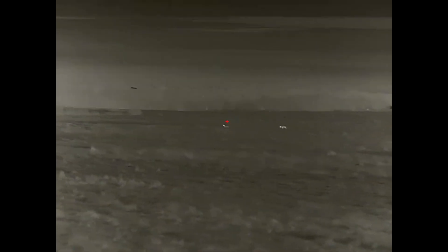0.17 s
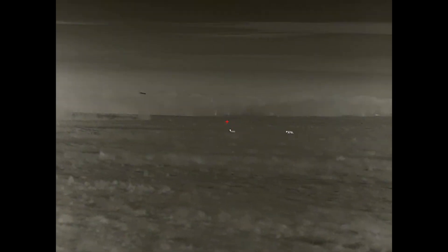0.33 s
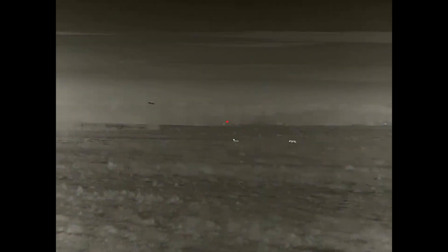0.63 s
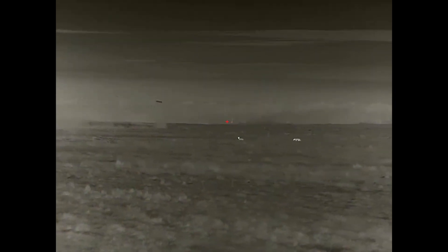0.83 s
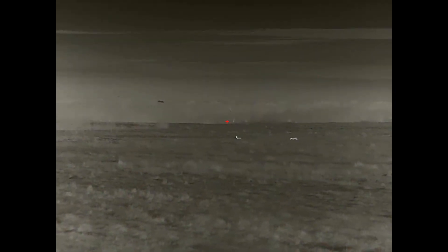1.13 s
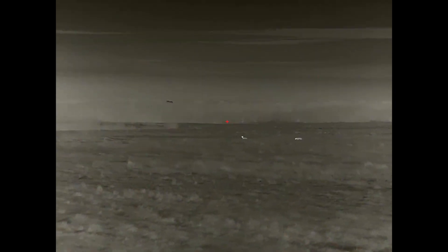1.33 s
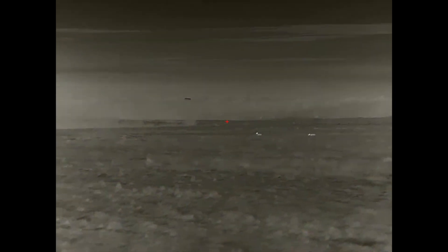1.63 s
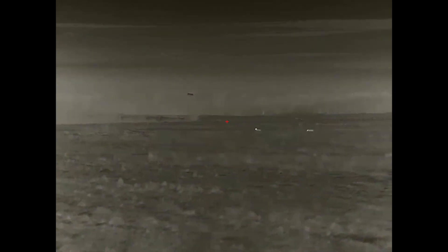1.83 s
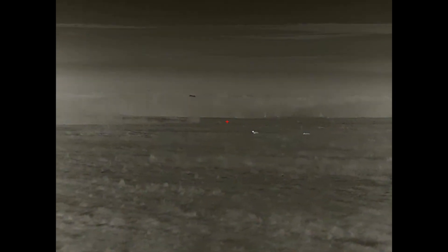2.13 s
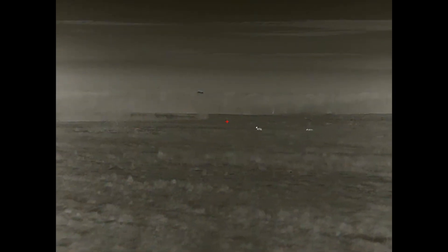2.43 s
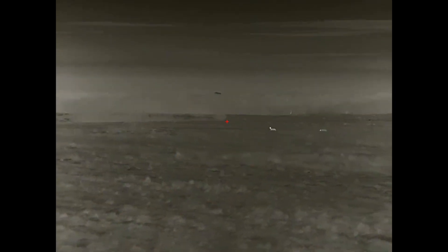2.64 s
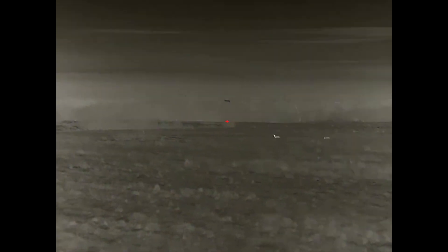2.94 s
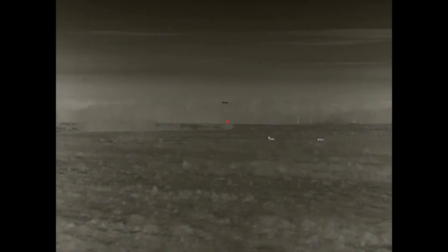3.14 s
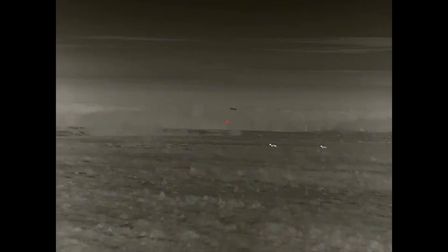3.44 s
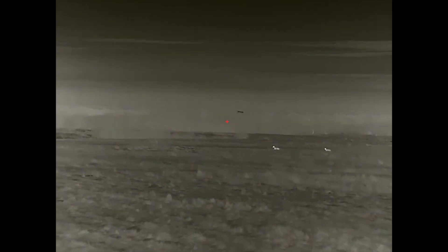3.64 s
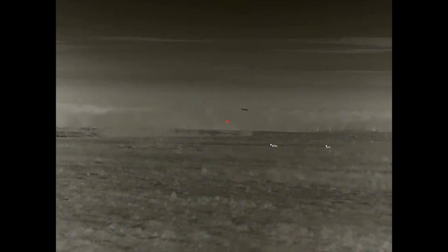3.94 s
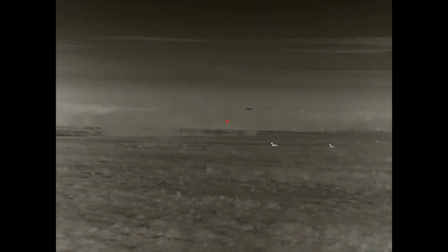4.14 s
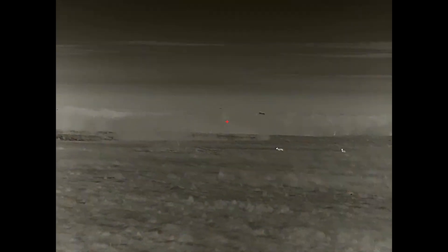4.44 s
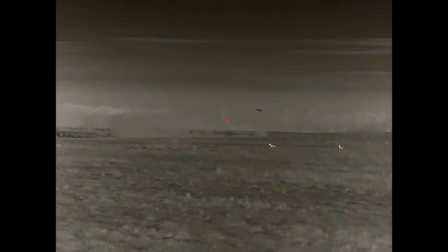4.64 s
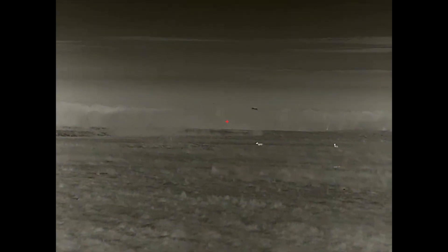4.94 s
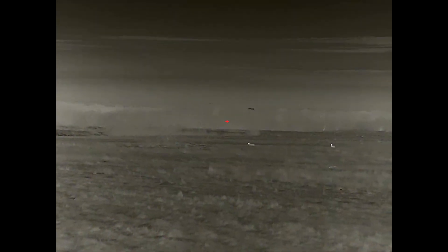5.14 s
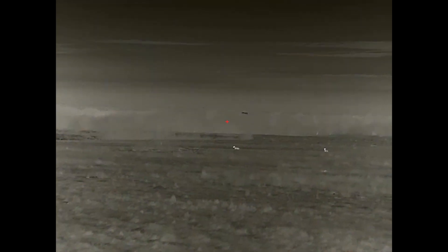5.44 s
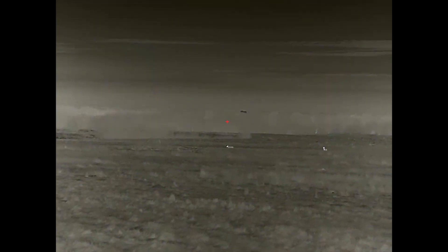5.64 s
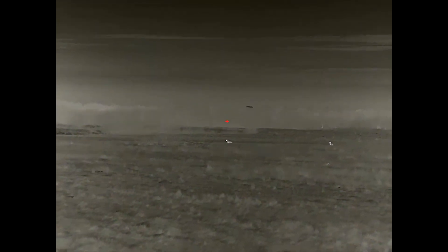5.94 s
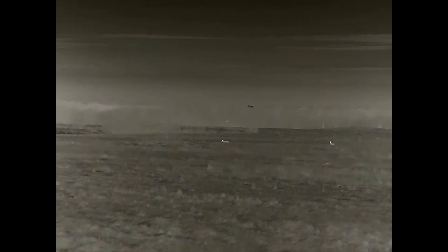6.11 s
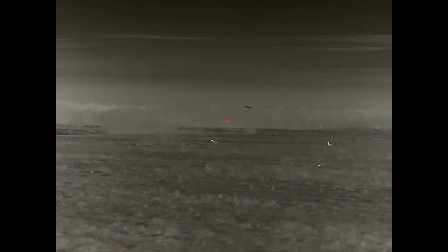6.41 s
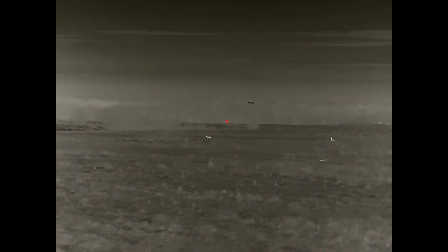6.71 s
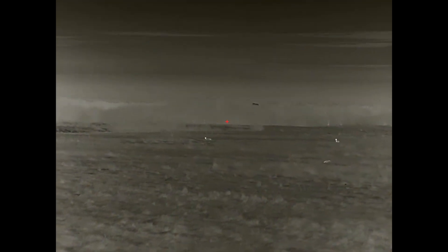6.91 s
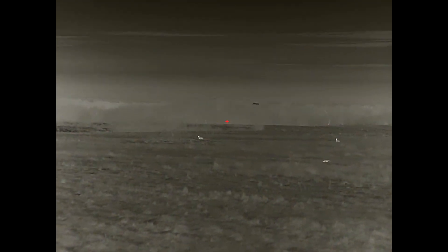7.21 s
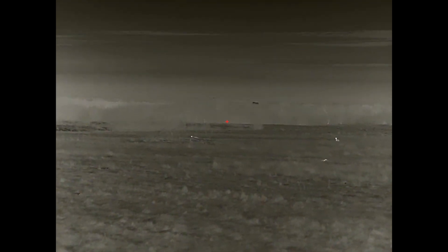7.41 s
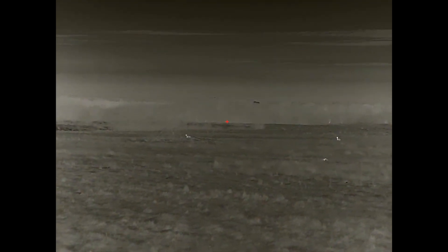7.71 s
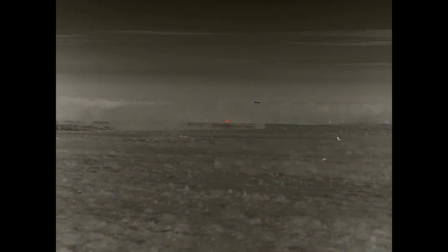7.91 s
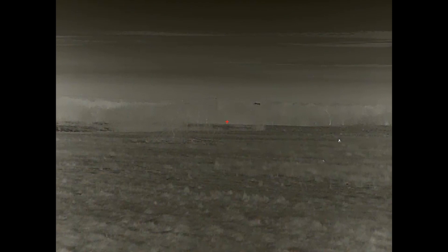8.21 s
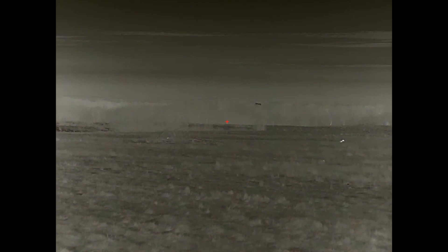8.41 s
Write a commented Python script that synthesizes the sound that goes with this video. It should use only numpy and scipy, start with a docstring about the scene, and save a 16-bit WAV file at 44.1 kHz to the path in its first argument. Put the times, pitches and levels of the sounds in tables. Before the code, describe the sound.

In an open field at night, thin bassless yelps like a coyote in distress, probably from a lure loudspeaker, repeat nearly without pause and leave echoing tails. A hand-held stereo microphone catches rumbling gusts, faint hiss, small rubs and clicks, mostly in the first two seconds. Wind eases around five to six seconds, when faint low blips appear, then it returns.

```python
"""Yelps over a windy field

One high canine voice yelps about twice a second over an open field at night, probably played by a lure
loudspeaker: gliding harmonics that stop near 5 kHz, with decaying noise as a long echo. The yelps drift left.
Bands of turbulent noise buffet the microphone ports over a steady hiss. The housing rustles and ticks in
the hands as enveloped noise, and a few low blips sound as gliding sines."""
import sys
import numpy as np
from scipy import signal
from scipy.fft import rfft, irfft, next_fast_len
from scipy.io import wavfile
from scipy.ndimage import uniform_filter1d

SR = 44100
rng = np.random.default_rng(int(sys.argv[2]) if len(sys.argv) > 2 else 0)


def digitize_waveform(pressure):
    """Quantize a signal to 16-bit integers and store it at the path in sys.argv[1].

    Rows of a 2-D input are taken as channels; values are limited to [-1, 1].
    """
    field = np.atleast_2d(pressure).T
    bounded = np.clip(field, -1, 1)
    quanta = np.round(bounded * 32767).astype(np.int16)
    wavfile.write(sys.argv[1], SR, quanta)


N = 377496
TIME = np.arange(N) / SR
SIDE_SHARE = .42  # left-right difference noise against the common noise, in hiss and rustle
OPPOSITE = np.array([[1], [-1]])  # left and right in opposite phase

# where the voice breaks into a rasp: start t/s, end t/s, roughness [0-1], strong-weak depth [0-1],
# hoarse air level/dB
RASPS = [(1.76, 1.95, .22, 0, -66), (3.12, 3.17, .15, 0, -64), (4.1, 4.24, .15, 0, -70),
         (4.8, 4.93, .3, 0, -61), (6.85, 6.9, .25, 0, -63), (7.2, 7.34, .15, .15, -62),
         (7.35, 7.4, .45, 0, -53), (7.645, 7.8, .5, .8, -53), (7.98, 8.16, .3, 0, -61),
         (8.45, 8.56, .45, .3, -57)]


def undb(db):
    """Amplitude ratio of a level in dB: 20 dB for each factor of ten."""
    return 10 ** (np.asarray(db) / 20)


def unit(x):
    """Normalises the power: scaled to rms 1."""
    return x / np.sqrt(np.mean(x ** 2))


def on_log(hz, table):
    """Interpolates (f/Hz, value) rows along log frequency, as pitch is spaced."""
    f, value = np.transpose(table)
    return np.interp(np.log(np.maximum(hz, 1)), np.log(f), value)


def shaped(x, gain):
    """Linear filtering: the spectrum is multiplied by a gain that depends on frequency."""
    size = next_fast_len(N)
    f = np.arange(size // 2 + 1) * SR / size
    return irfft(rfft(x, size) * gain(f), size)[:N]


def walk(rate):
    """Low-pass random modulation: levels held 1 / rate s, slewed twice, rms 1."""
    hold = int(SR / rate)
    steps = np.repeat(rng.standard_normal(N // hold + 1), hold)
    slewed = uniform_filter1d(uniform_filter1d(steps, hold), hold)
    return unit(slewed[:N])


def sides(x, pan_db):
    """Level-difference stereo: places a sound by its left minus right level."""
    return x * undb(np.array([pan_db, -pan_db]).reshape(2, -1) / 2)


def bell(s, half_s):
    """Gaussian envelope: a smooth rise and fall around a moment, down to 1/e after half_s."""
    return np.exp(-((TIME - s) / half_s) ** 2)


def wind():
    """Turbulence as band noise: eddies puff the upper bands together, and each band flickers alone."""
    # level between the buffets: t/s, level/dB
    calm_levels = [(0, -37.5), (.3, -37.5), (.7, -40.5), (1.1, -41), (1.6, -41.5), (1.9, -38.5),
                   (2.2, -40.5), (2.8, -41.5), (3.15, -39.5), (3.55, -35.5), (3.85, -41), (4.5, -44),
                   (5.2, -47), (6.25, -46.5), (6.5, -42.5), (7, -41), (7.8, -41), (8.56, -42)]
    # buffets and lulls: t/s, rise level/dB, half length t/s
    buffets = [(0.05, 1.5, .05), (0.316, 3, 0.044), (0.507, 5.5, 0.013), (0.937, 7, 0.019),
               (1.205, 4, 0.058), (1.366, 6.5, 0.043), (1.525, 4, 0.026), (1.69, 6.5, 0.068),
               (2.054, 5.5, 0.038), (2.39, 3, 0.044), (2.554, 3.5, 0.025), (3.004, 3.5, .04),
               (3.088, -4, 0.045), (3.94, 4.5, 0.14), (4.618, -3, 0.088), (5.7, 3, 0.06),
               (6.057, 2.5, 0.08), (7.907, -6, 0.043), (8.284, 6.5, 0.048)]
    # relative spectral density of the turbulence: f/Hz, level/dB per Hz
    turbulence_colour = [(12, -26), (20, -5), (69, 3), (131, 2), (274, -12.5), (381, -20.5), (479, -22.5),
                         (698, -33), (808, -34.5), (1000, -40), (1300, -44.5), (2200, -120)]
    # upper bands move more than the rumble: extra dB per dB, about the even level
    gust_slope, gust_even_db = 0.76, -41.5

    def colour(f):
        return undb(on_log(f, turbulence_colour))

    puffs, noise = walk(14), rng.standard_normal(N)
    rumble_db = np.interp(TIME, *np.transpose(calm_levels))
    rumble_db = rumble_db + sum(db * bell(s, half_s) for s, db, half_s in buffets)
    gust_db = rumble_db + gust_slope * (rumble_db - gust_even_db)
    scale = np.std(shaped(noise, colour))

    common = np.zeros(N)
    for hz in 22 * 2 ** np.arange(0, 6.5, .5):  # centres half an octave apart
        def band_gain(f):
            octaves = np.clip(np.log2(f / hz + 1e-9), -.5, .5)
            return np.cos(np.pi * octaves) ** 2 * colour(f)

        band = shaped(noise, band_gain)
        upper = np.clip(np.log2(hz / 130) / 0.88, 0, 1)  # 0 follows the rumble, 1 the gusts
        level_db = (1 - upper) * rumble_db + upper * (gust_db + 1.58 * puffs)
        common += band * undb(level_db + 1.85 * walk(7.6)) / scale

    # the difference between the ports lacks the deepest rumble
    apart = shaped(rng.standard_normal(N), lambda f: colour(f) * f / (f + 300))
    return sides(common, 1.93) + undb(gust_db - 39.0) * unit(apart) * OPPOSITE


def hiss():
    """Stationary microphone noise, partly correlated between left and right."""
    # relative spectral density: f/Hz, level/dB per Hz
    hiss_colour = [(530, -11.5), (900, -6.5), (1040, 0), (2430, -8), (3090, -14), (3750, -16.5),
                   (5000, -14), (14400, -20), (15800, -24.5)]
    hiss_db = -74.5  # rms of the common part

    def colour(f):
        return undb(on_log(f, hiss_colour)) * (f > 700)

    mid, side = (unit(shaped(rng.standard_normal(N), colour)) for _ in range(2))
    return undb(hiss_db) * (mid + SIDE_SHARE * side * OPPOSITE)


def housing():
    """Friction and impact noise: fingers rub the housing in small grains; now and then it ticks."""
    # rubs of the fingers: t/s, greatest rms level/dB, half length t/s
    rubs = [(.03, -64.5, 0.081), (0.37, -72, 0.22), (0.812, -68.5, 0.13), (1.23, -70, 0.19),
            (1.391, -60.5, 0.054), (1.512, -72, 0.057), (1.85, -72, 0.26), (2.08, -77.5, 0.084),
            (2.35, -75.5, 0.18), (3.38, -77, .1), (3.956, -77, 0.12), (4.177, -77.5, 0.24),
            (5.652, -73, 0.13), (5.965, -76, 0.034), (7.978, -82, 0.031)]
    # ticks: t/s, level/dB before a 2.5 dB trim, left minus right level/dB
    ticks = [(0.0404, -52, -4), (0.0952, -41.5, -4), (1.0723, -44.5, 3), (1.1358, -53, 4),
             (1.1927, -54, -0.5), (1.2267, -46, 6), (1.2875, -54, -0.5), (1.315, -48, 0.0),
             (1.3314, -44, -2), (1.372, -41, -0.5), (1.4785, -50, 0.0), (1.872, -49, 0), (2.131, -52, 0),
             (2.267, -55, 5), (3.9167, -59, 11), (4.367, -52, 6), (5.6441, -52, 4), (8.0073, -49.5, 8)]

    def bright(f):
        return f / (f + 1500) / (1 + (f / 8000) ** 2)

    mid, side = rng.standard_normal((2, N)) * undb(3.0 * walk(150))
    out = np.array([unit(shaped(mid + sign * SIDE_SHARE * side, bright)) for sign in (1, -1)])
    out *= sum(undb(db) * bell(s, half_s) for s, db, half_s in rubs)

    t = TIME[:600]
    decay = np.exp(-t / 0.001)
    # one-pole smoothing dulls the tick noise
    tick_noise = signal.lfilter([1], [1, -.4], rng.standard_normal((len(ticks), len(t))))
    for (s, db, pan_db), noise in zip(ticks, tick_noise):
        i = int(s * SR)
        tick = undb(db - 2.5) * noise * decay
        out[:, i:i + len(t)] += sides(tick, pan_db)[:, :N - i]
    return out


def voice():
    """Harmonics of a gliding pitch; rasps modulate size and phase, strong-weak cycles add subharmonics."""
    # one table per yelp: t/s, pitch f/Hz, throat level/dB, brightness level/dB per partial (up to two steps)
    yelp_tracks = [
        [(0.082, 1087, -63, 10), (0.12, 1358, -48, 1), (0.164, 1198, -48, -1), (0.218, 1053, -52, 3.5),
         (0.269, 1045, -50, -7)],
        [(0.281, 1310, -53.5, -2), (0.311, 1493, -41.0, 2.5), (0.363, 1564, -46, 1.5), (0.431, 1856, -44, -3),
         (0.483, 1900, -49, 7.5), (0.537, 1993, -45, -4), (0.555, 2054, -53, -2)],
        [(0.726, 1190, -51.5, 1), (0.756, 1473, -46.0, 6), (0.79, 1552, -44.5, 4.5), (0.866, 1907, -50.5, 3.5),
         (0.89, 1876, -42.5, -3.5), (0.926, 1630, -47.5, 4), (0.98, 1783, -52.5, -1.5)],
        [(1.141, 1275, -46, 0), (1.229, 1451, -46, 6.5), (1.267, 1703, -47.5, -4.5), (1.339, 1833, -41.5, -5),
         (1.363, 1974, -59.5, 1), (1.405, 1997, -46, -1), (1.429, 1940, -58, 5), (1.451, 1735, -49.5, -11),
         (1.499, 1510, -51, -9)],
        [(1.68, 1106, -52.5, -1.5), (1.752, 1378, -39.5, 1.5), (1.788, 1772, -48.5, 4), (1.828, 1804, -49, 0),
         (1.866, 1487, -38, -22), (1.89, 1480, -33, -10.5), (1.954, 1710, -46, 2.5), (1.999, 1730, -69, 3)],
        [(2.201, 1221, -56, 8), (2.237, 1321, -40, -0.5), (2.259, 1359, -54, 8), (2.321, 1337, -40, -8),
         (2.357, 1437, -46.5, 5), (2.432, 1774, -48.0, 3), (2.468, 1788, -56, 1)],
        [(2.782, 1157, -56, -1), (2.808, 1152, -52.5, 5), (2.895, 1108, -49, -2.5), (2.919, 1148, -47.5, -3)],
        [(2.991, 1520, -47, -3), (3.011, 1693, -49.0, 4), (3.065, 1454, -48.5, 5.5), (3.151, 1585, -52, 6),
         (3.227, 1750, -53, 6), (3.279, 1720, -43.0, 1), (3.299, 1850, -45.5, -3), (3.328, 1740, -52, -2.5)],
        [(3.496, 1090, -47, -2), (3.53, 1322, -45.5, 2.5), (3.585, 1355, -50, 7), (3.61, 1596, -42.5, -7),
         (3.67, 1522, -49.0, -7), (3.706, 1435, -51, -3), (3.74, 1458, -36.5, -9), (3.757, 1592, -36.5, -6.5),
         (3.777, 1392, -44.5, 1), (3.837, 1360, -48.5, 4), (3.85, 1368, -43, 1), (3.867, 1611, -40.5, -5),
         (3.919, 1535, -65, -4)],
        [(4.071, 1067, -61, 3), (4.111, 1288, -45, 1.5), (4.133, 1314, -42, 3.5), (4.173, 1070, -43.5, -6.5),
         (4.222, 1030, -42, -1), (4.248, 1038, -58, -5)],
        [(4.532, 972, -46, 0), (4.574, 1155, -48, 5), (4.62, 1094, -49, 2.5), (4.655, 1086, -64, -0.5)],
        [(4.721, 1270, -55, -11), (4.757, 1451, -39.5, 3), (4.777, 1514, -51, 1.5), (4.809, 1490, -45, 8),
         (4.829, 1647, -50, 3.5), (4.852, 1668, -49.5, 9), (4.869, 1487, -51.0, 3.5), (4.893, 1925, -54.5, 2.5),
         (4.927, 1638, -50.5, 5.5), (4.969, 1750, -48, 0), (4.987, 1798, -58, 7), (4.997, 1512, -49.5, -7),
         (5.019, 1560, -35.5, -11)],
        [(5.21, 1142, -56.5, 7), (5.262, 1327, -48, 4), (5.31, 1338, -52.5, 3), (5.336, 1205, -45.5, 1),
         (5.396, 1245, -47, -2.5), (5.45, 1235, -37.5, -10), (5.521, 1266, -42, 2), (5.569, 1358, -52.5, -3.5)],
        [(5.747, 1130, -55.5, 3), (5.775, 1307, -55, 8.5), (5.835, 1283, -56.5, 7.5), (5.865, 1460, -57.0, -10),
         (5.913, 1513, -55, -11.5), (5.978, 1550, -57, -6.5)],
        [(6.182, 984, -46.5, 1.5), (6.216, 1119, -48.5, 3.5), (6.256, 1125, -46, 2), (6.278, 1128, -48.0, -9),
         (6.3, 1110, -64, 4)],
        [(6.631, 1310, -56, 3.5), (6.663, 1504, -49.5, 4.5), (6.82, 1614, -51.5, 4.5), (6.842, 1610, -48, 6),
         (6.866, 1905, -49, -5), (6.894, 1786, -49, 1), (6.918, 1860, -54, 2)],
        [(7.052, 1140, -42.5, 1), (7.08, 1296, -45.5, 3), (7.116, 1357, -47.5, 5), (7.196, 1282, -47.5, 1),
         (7.287, 1297, -42.5, 0), (7.335, 1434, -46, -1.5), (7.373, 1836, -45.5, -1.5), (7.403, 1770, -57.5, 0),
         (7.419, 1835, -63.5, 4)],
        [(7.651, 1186, -46, -12), (7.673, 1308, -47.5, -3), (7.7, 1460, -44.5, -8), (7.746, 1367, -45, -1),
         (7.766, 1235, -39, -11), (7.808, 1245, -50, -11), (7.896, 1392, -43.5, -5), (7.94, 1330, -45.0, -4),
         (8.0, 1480, -46, 2.5), (8.058, 1080, -49.5, -4), (8.1, 1091, -57, 4.5), (8.124, 1238, -33.5, -18),
         (8.141, 1474, -56, 0.5), (8.199, 1216, -49.5, 5)],
        [(8.451, 1160, -58, 4), (8.463, 1258, -45, -12), (8.501, 1650, -50, -5), (8.549, 1690, -49.5, -2)],
    ]
    # colour of mouth and loudspeaker on every partial: f/Hz, level/dB
    mouth = [(1000, -24), (1200, -3.5), (1450, -11.5), (1620, 3.5), (1900, 14.5), (2200, 9), (2450, -1),
             (2750, 10.5), (2950, 10), (3100, 2), (3350, 8), (3700, -6), (4000, 1.5), (4400, -4),
             (5100, -0.5), (5600, -18), (6200, -12.5), (7500, -40)]
    # each partial at the throat against the yelp's level: level/dB
    partials_db = [0.5, -12, -20.5, -31, -38.5]
    patchy_db = 1.1  # spread per partial number, up to the third: each partial breaks up on its own

    rough, halved = np.full(N, .13), np.zeros(N)
    for t0, t1, share, depth, _ in RASPS:
        rasp = slice(int(t0 * SR), int(t1 * SR))
        rough[rasp], halved[rasp] = share, depth
    rough, halved = uniform_filter1d(rough, size=400), uniform_filter1d(halved, size=400)

    # random modulators of phase, size, pitch and level
    shake, throb, tremble, quaver = walk(260), walk(220), walk(70), walk(60)
    patches = [walk(45) for _ in partials_db]
    out = np.zeros(N)
    for track in yelp_tracks:
        s, *columns = np.transpose(track)
        i = np.arange(int(s[0] * SR), min(int(s[-1] * SR), N))
        hz, db, bright_db = (np.interp(TIME[i], s, column) for column in columns)
        hz = uniform_filter1d(hz, size=300) * (1 + .008 * tremble[i])
        phase = 2 * np.pi * np.cumsum(hz) / SR + rough[i] * shake[i]

        tone = np.zeros(len(i))
        for k, partial_db in enumerate(partials_db, 1):
            level_db = db + partial_db + min(k - 1, 2) * bright_db
            level_db = level_db + on_log(k * hz, mouth)
            level_db = level_db + min(k, 3) * patchy_db * patches[k - 1][i]
            tone += undb(level_db) * np.sin(k * phase)

        edges = np.clip(np.minimum(TIME[i] - s[0], s[-1] - TIME[i]) / .004, 0, 1)  # 4 ms ramps
        unsteady = undb(2. * quaver[i]) * (1 + rough[i] * throb[i])
        unsteady = unsteady * (1 + halved[i] * np.sin(phase / 2))  # strong and weak cycles alternate
        out[i] += np.sqrt(2) * tone * edges * unsteady
    return out


def hoarse():
    """Resonance excited by noise: turbulent throat air in coarse spurts wherever the voice breaks."""
    # throat resonances: f/Hz, width f/Hz, level/dB
    throat = [(1900, 460, 5), (3150, 150, -3), (4200, 620, -19)]

    def rings(f):
        return sum(undb(db) / (1 + (2 * (f - hz) / width) ** 2) for hz, width, db in throat)

    air = np.zeros(N)
    for t0, t1, _, _, db in RASPS:
        air[int(t0 * SR):int(t1 * SR)] = undb(db)
    spurts = undb(4. * walk(110))
    turbulence = unit(shaped(spurts * rng.standard_normal(N), rings))
    return uniform_filter1d(air, size=1000) * turbulence


def echoes(x):
    """Reverberation as convolution with decaying noise: a near tail dies fast, a far one lingers."""
    # tails before onset and colour: energy level/dB, time to fall 60 dB t/s
    decays = [(-5, 0.32), (-9, 0.85)]
    # echo against direct sound, which beams its strongest band forward: f/Hz, level/dB
    echo_colour = [(1100, -2), (1550, -3), (1800, -8), (2000, -10), (2300, -1), (3000, 2), (4000, -2),
                   (5500, -5)]
    onset_s = .01  # time constant of the build-up

    t = TIME[:SR * 3 // 2]
    # the divisor gives each decay unit energy
    tail = sum(undb(db - 60 * t / t60_s) / np.sqrt(t60_s * SR / np.log(1e6)) for db, t60_s in decays)
    tail = tail * rng.standard_normal(len(t)) * (1 - np.exp(-t / onset_s))
    reverberant = signal.fftconvolve(x, tail)[:N]
    return shaped(reverberant, lambda f: undb(on_log(f, echo_colour)))


def yelps():
    """Acoustic shadowing: both ports hear one voice; the housing shades the right, most near 1900 Hz."""
    # drift before the share by pitch: t/s, left minus right level/dB
    drift = [(0, .5), (.66, 1.5), (1.29, 3.5), (4.1, 4.5), (5.6, 5.5), (6.5, 4.5), (8.56, 6)]
    # how much of the drift each frequency takes: f/Hz, share [ratio]
    drift_share = [(1000, 1.2), (1900, 2.2), (2800, 1.15), (5000, 1.4)]
    speaker_low_hz = 890  # the small loudspeaker gives no bass

    def speaker(f):
        return 1 / np.sqrt(1 + (speaker_low_hz / (f + 1)) ** 12)

    direct = shaped(voice() + hoarse(), speaker)
    heard = direct + echoes(direct)
    # tanh turns a level difference into the side-to-middle ratio
    lean = np.tanh(np.log(10) / 40 * np.interp(TIME, *np.transpose(drift)))
    side = lean * shaped(heard, lambda f: on_log(f, drift_share))
    return np.array([heard + side, heard - side])


def blips():
    """Linear chirps under half-sine envelopes, with random amplitude modulation as flutter."""
    # short low blips: t/s, peak level/dB before flutter and panning, start f/Hz, end f/Hz, length t/s
    chirps = [(1.136, -57.5, 828, 760, 0.055), (2.87, -62, 781, 804, 0.095), (5.397, -63, 920, 803, 0.092),
              (5.402, -59, 406, 454, 0.026), (5.505, -60, 743, 1060, .07), (5.533, -54.5, 494, 573, 0.082),
              (5.596, -58, 840, 710, 0.047), (5.7, -53.5, 843, 800, 0.061), (5.726, -55, 522, 478, 0.072),
              (5.944, -61, 728, 804, 0.036), (5.982, -54, 844, 797, 0.062), (6.037, -62, 914, 687, 0.061),
              (6.148, -64, 722, 865, 0.039), (6.24, -63, 840, 646, 0.038), (8.154, -61, 840, 820, 0.037),
              (8.199, -52, 823, 812, 0.041)]
    out = np.zeros(N)
    for s, db, from_hz, to_hz, length in chirps:
        t = TIME[:int(length * SR)]
        i = int(s * SR)
        phase = 2 * np.pi * t * (from_hz + (to_hz - from_hz) * t / length / 2)
        out[i:i + len(t)] += undb(db) * np.sin(np.pi * t / length) * np.sin(phase)
    return sides(out * undb(3. * walk(90)), 5.4)


def scene():
    """Superposition of wind, hiss, hands, yelps and blips at the two ports."""
    return wind() + hiss() + housing() + yelps() + blips()


def record(dry):
    """Band limiting: the recorder cuts the top with a steep elliptic low-pass."""
    top_hz = 15650
    lowpass = signal.ellip(10, .2, 60, top_hz, fs=SR, output="sos")  # .2 dB ripple, 60 dB stopband
    return signal.sosfilt(lowpass, dry)


dry = scene()
out = record(dry)
digitize_waveform(out)
```